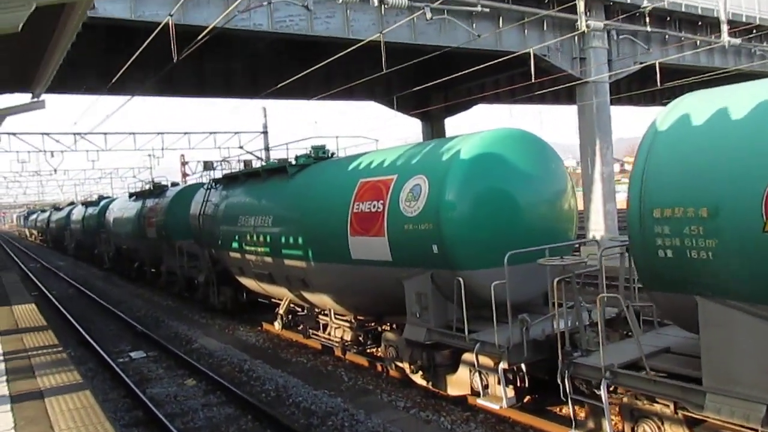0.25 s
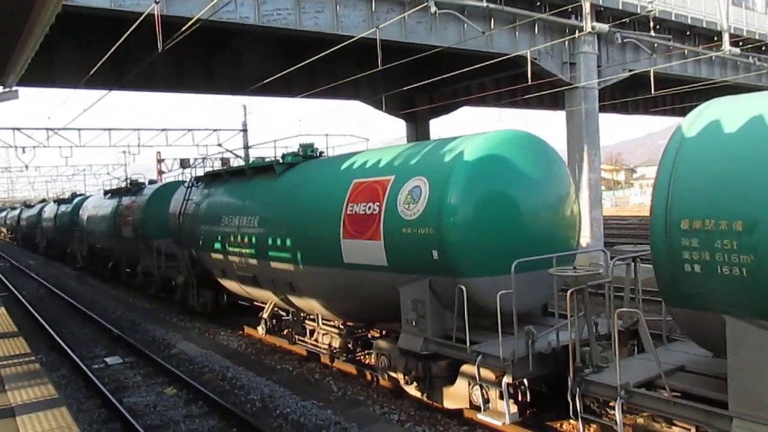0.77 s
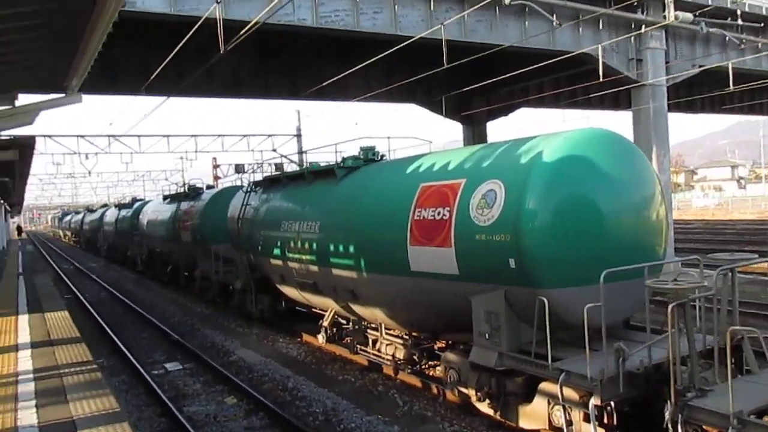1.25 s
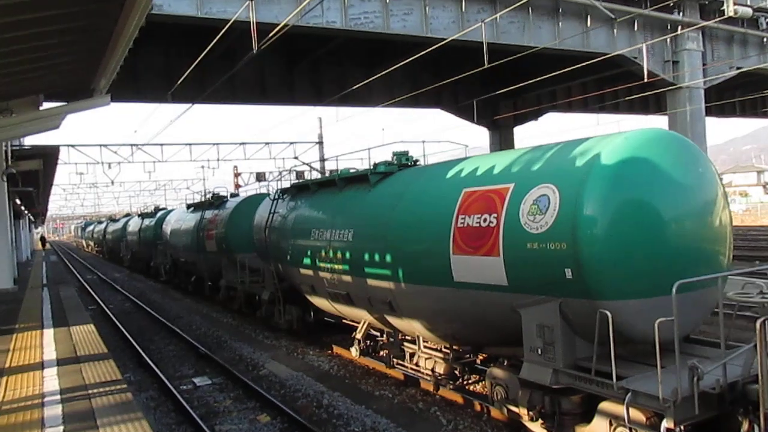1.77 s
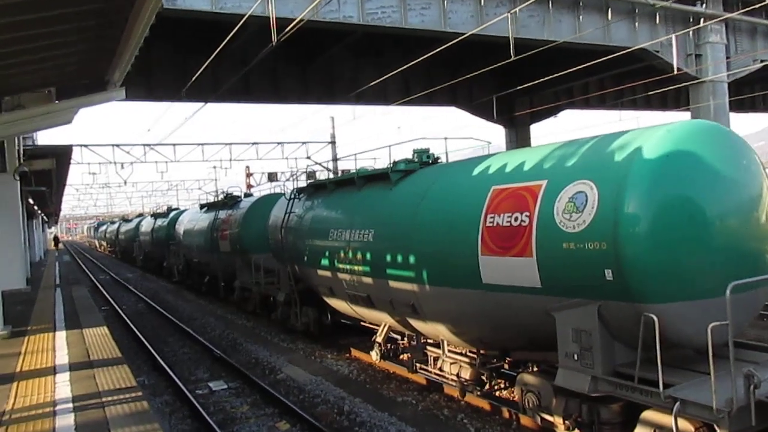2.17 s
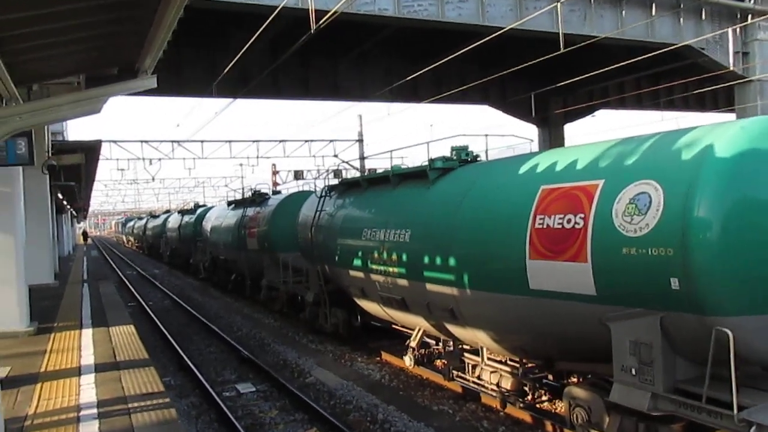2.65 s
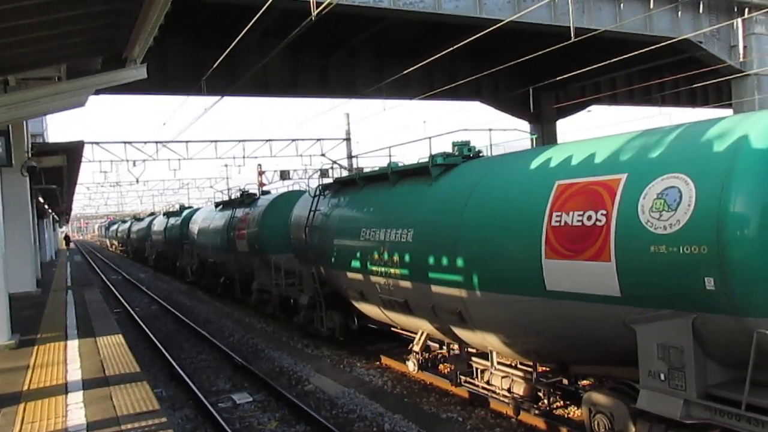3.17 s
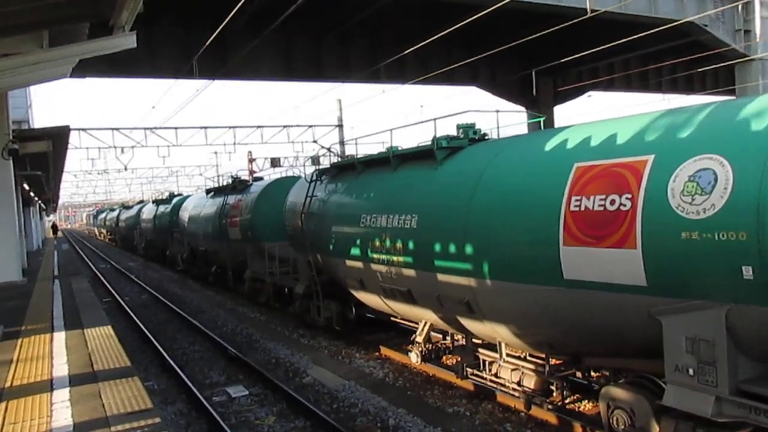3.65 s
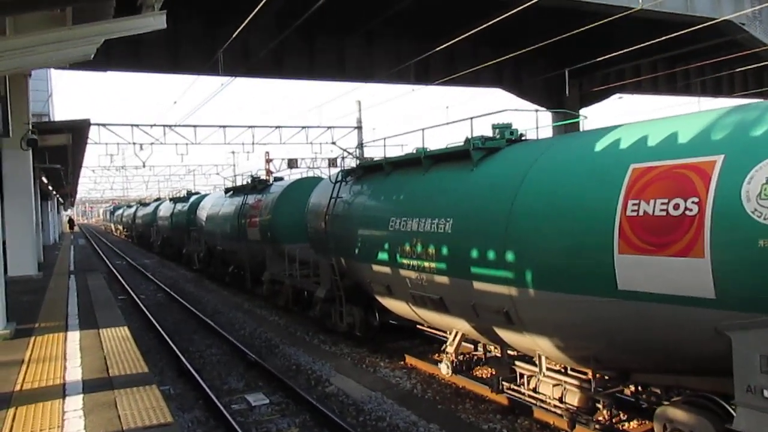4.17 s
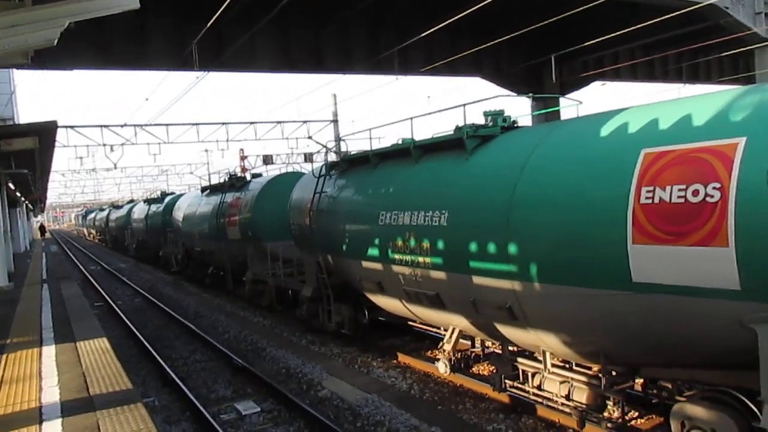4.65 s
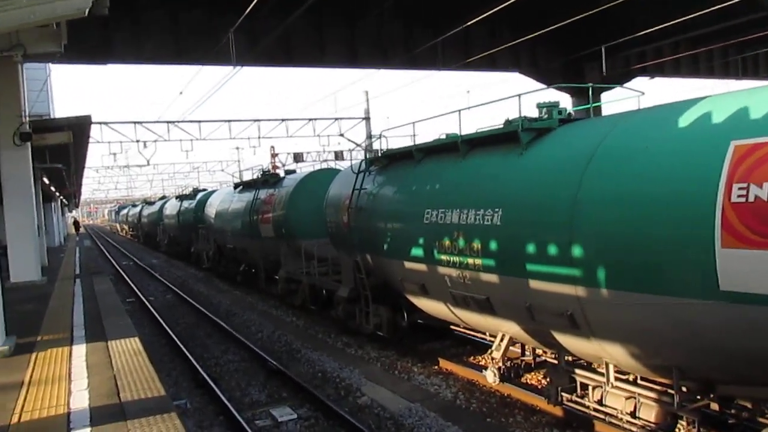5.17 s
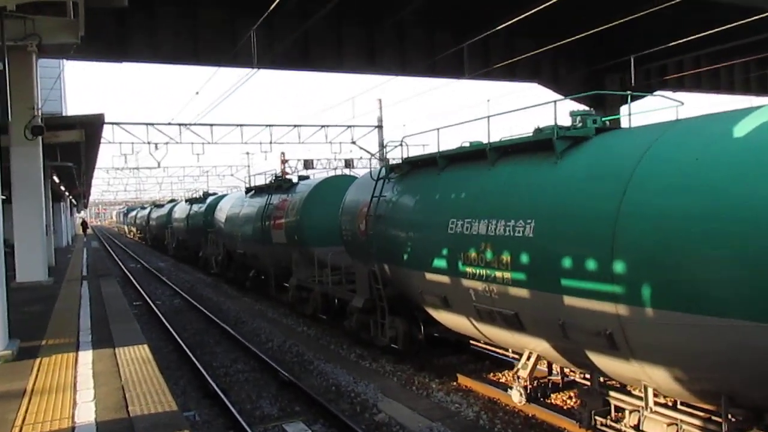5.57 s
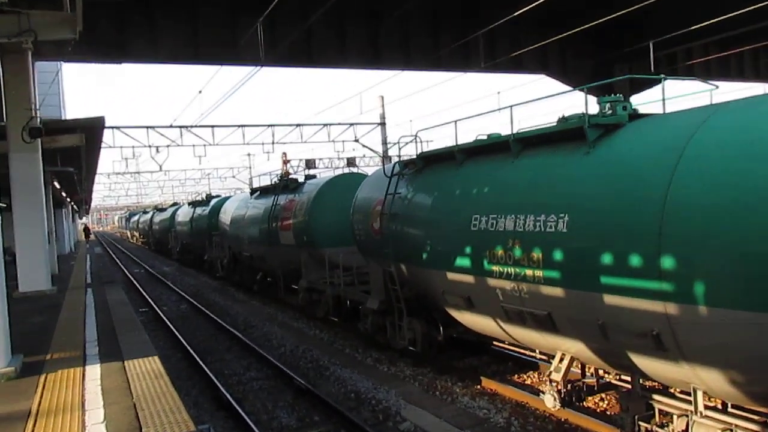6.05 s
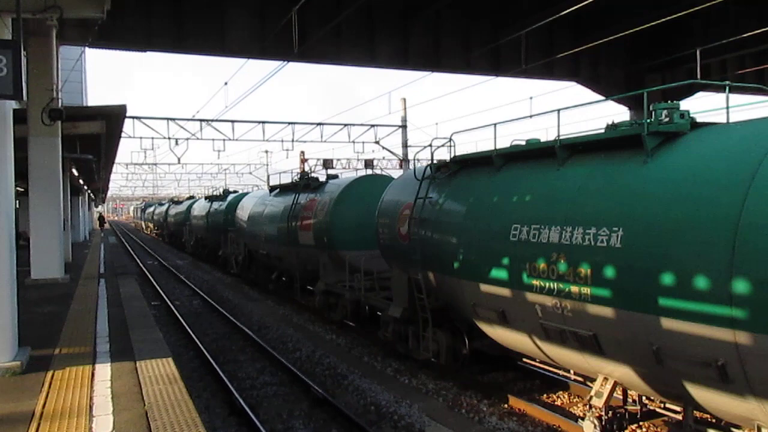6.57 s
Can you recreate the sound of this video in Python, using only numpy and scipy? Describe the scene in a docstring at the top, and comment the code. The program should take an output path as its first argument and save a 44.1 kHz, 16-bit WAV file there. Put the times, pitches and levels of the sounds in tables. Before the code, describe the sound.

A standing line of tank wagons releases its brake air beside a station platform. A bright, sizzling hiss and a hollow roar run from the start; the treble slowly fades while the roar holds. From about two and a half seconds a breathy mid-pitched whistle joins. Soft echoes glide through the jet, distant rumble lies beneath, and wind flutters on the microphone, mostly at right.

```python
"""A hollow roar and a bright hiss of escaping air, the hiss fading first, with a breathy whistle over them.
A standing train of tank wagons releases its air brakes, heard from the platform under a road bridge.
Jet and whistles are shaped noise; the listener moves along the wagons, so short gliding echoes colour the jet.
Behind lie a low rumble, a faint hum and soft rushes; light wind flutters mostly on the right microphone."""
import sys
import numpy as np
from scipy import signal
from scipy.fft import rfft, irfft, next_fast_len
from scipy.io import wavfile
from scipy.ndimage import uniform_filter1d

SR = 44100
rng = np.random.default_rng(int(sys.argv[2]) if len(sys.argv) > 2 else 0)


def file_out(sig):
    """Save sig as 16-bit WAV at sys.argv[1]."""
    # one column per channel
    cols = np.atleast_2d(sig).T
    # limit, then scale
    lim = np.clip(cols, -1, 1)
    pcm = np.round(lim * 32767).astype(np.int16)
    wavfile.write(sys.argv[1], SR, pcm)


N = 300758
TIME = np.arange(N) / SR

# Station rumble colour. Each row: frequency [Hz], relative spectral density [dB].
YARD_COLOUR = [(15, -7), (35, 1), (80, -0.5), (150, -2), (250, -1), (380, -3), (500, 2), (650, 0.5),
               (1000, -12.5), (2000, -34)]
# Colour of the low rushes. Each row: frequency [Hz], relative spectral density [dB].
RUSH_COLOUR = [(150, -17), (280, 1.5), (400, -2), (520, 4.5), (750, -4.5), (1200, -18)]
# Soft low rushes nearby. Each row: centre [s], level before the common lift [dB], half-length [s].
RUSHES = [(2.03, -43, 0.07), (2.25, -46, 0.13), (5.57, -45.5, .066), (5.82, -47, 0.18)]
YARD_DB, HUM_HZ, HUM_PEAK_DB = -46, 84, -60

# Colour of large eddies. Each row: frequency [Hz], relative spectral density [dB].
LARGE_EDDY_COLOUR = [(12, 7), (30, -2), (70, 4), (120, -1), (180, -9.5), (280, -23), (600, -46)]
# Colour of small eddies. Each row: frequency [Hz], relative spectral density [dB].
SMALL_EDDY_COLOUR = [(80, -5), (150, -2), (250, -5), (400, -27), (700, -38)]
# Strongest wind puffs. Each row: centre [s], large-eddy level [dB], half-length [s].
PUFFS = [(.878, -23, 0.009), (1.005, -31.5, 0.031), (1.46, -37, .04), (2.52, -37.5, 0.18),
         (2.79, -31, 0.02), (3.56, -34.5, 0.055), (3.95, -32.5, 0.044), (4.125, -30.5, 0.018),
         (4.31, -34.5, 0.021), (5.2, -29, 0.044), (5.31, -36, .03), (5.995, -25, 0.012), (6.21, -29, 0.032),
         (6.42, -32.5, .025), (6.565, -28, .02)]
# Breeze between puffs: mean level rises over the first 2.5 s, then holds; gusts spread about it.
BREEZE_START_DB, BREEZE_HELD_DB, BREEZE_RISE_S = -58, -47.5, 2.5
GUST_SPREAD_DB, GUST_RATE_HZ = 5, 5

# Level difference between the ears. Each row: frequency [Hz], left minus right [dB].
EAR_DIFFERENCE = [(500, 0), (1200, -.5), (2500, -2), (4500, -1), (8000, 3), (12000, 3.4), (15000, -2)]
# Scattering on the way to the ears. Each row: frequency [Hz], diffuse-to-direct ratio [dB],
# to which the overall diffuse level is added.
SCATTER = [(500, -15.5), (1200, -4), (2000, -5.5), (3200, 6), (5000, -4.5), (7500, -3.5), (11000, 5),
           (15000, 24)]
# Right ear's lead. The one row: value at first [ms], change [ms per s].
RIGHT_LEAD = (-.036, .013)
# Left-right balance. The one row: value at first [dB], change [dB per s].
BALANCE = (0.56, -0.34)
# The valve is in plain view until the wagon's side hides it; then the diffuse level grows.
DIFFUSE_DB, HIDDEN_S, HIDING_DB_PER_S = -0.14, 3.85, 2

# Hollow colour of the exhaust port. Each row: frequency [Hz], relative spectral density [dB].
ROAR_COLOUR = [(400, -42), (700, -16), (870, -10), (1020, -2.5), (1180, 1), (1300, 0.5), (1460, -3.5),
               (1750, -15), (2200, -67)]
# Its upper band. Each row: frequency [Hz], relative spectral density [dB].
UPPER_ROAR_COLOUR = [(1500, -22), (1850, -4.5), (2250, -3), (2550, 3), (2800, 0.5), (3050, -6),
                     (3300, -10.5), (4000, -26)]
# Colour of the free jet. Each row: frequency [Hz], relative spectral density [dB].
HISS_COLOUR = [(2900, -26), (3500, -5.5), (4000, -1.5), (4500, 2.5), (4900, 5), (5200, 12.5), (5900, 3),
               (6900, 1), (7600, 3), (8250, 3.5), (9400, 5), (10000, -4.5), (12500, -24)]
# Its top band. Each row: frequency [Hz], relative spectral density [dB].
SIZZLE_COLOUR = [(9000, -18), (10500, -3), (10900, 4), (11400, -1.5), (12200, -0.5), (13100, 1), (14900, 0),
                 (16000, -1.5), (17000, -30)]
# Roar, upper roar, hiss, sizzle in turn as the pressure falls. Each row: level at first [dB],
# loss [dB per s, negative gains], share of the sway [ratio].
JET_PARTS = [(-27, -0.1, 1.1), (-32, 0.58, 0.88), (-28.5, 1.0653, 0.9), (-29, 2.1, 0.54)]
# Jet's sway about its steady fall as the listener walks on. Each row: time [s], level change [dB].
JET_SWAY = [(0, .5), (2.1, -0.27), (2.6, -0.76), (4.1, -1.5), (5.25, 1), (6.8, -0.06)]

# Higher outlet resonances, each swelling once as the listener passes. Each row: pitch at the loudest
# moment [Hz], width [Hz], peak level [dB], loudest moment [s], half-length [s].
RESONANCES = [(1948, 750, -40, .9, 1.57), (2098, 79, -42, 2.1, 0.31), (4250, 290, -42.5, 2.1, 0.54),
              (5024, 1200, -36.5, .5, 0.63), (5253, 450, -34.5, 3.45, 0.63), (6110, 730, -37, 1.0, 0.73),
              (7580, 440, -42, 4.3, 0.55), (9300, 83, -46, 2.3, 1.7), (10920, 220, -37.5, 1.9, 0.47),
              (12920, 400, -49, 4.3, 0.62), (13300, 450, -37, .4, 0.81), (14530, 160, -43, .6, .3)]
# Main whistle: pitch at its start and level before balance; all whistles share the sag.
WHISTLE_HZ, WHISTLE_WIDTH_HZ, WHISTLE_DB, SAG_SHARE_PER_S = 1172.6, 70, -28, .014
WHISTLE_START_S, WHISTLE_ATTACK_S, WHISTLE_HOLD_S, WHISTLE_RELEASE_S = 2.45, 0.36, 1.26, 2.3

LOWPASS_HZ = 15800


def from_db(db):
    """Decibels to amplitude gain."""
    return 10 ** (np.asarray(db) / 20)


def rms_one(x):
    """Scale to unit rms."""
    return x / np.sqrt(np.mean(x ** 2) + 1e-20)


def coloured(x, spectrum):
    """Filter by rows of (Hz, dB), joined on a log-frequency axis."""
    size = next_fast_len(N)
    table_hz, table_db = np.transpose(spectrum)
    bin_hz = np.maximum(np.fft.rfftfreq(size, 1 / SR), 1)
    gain = from_db(np.interp(np.log(bin_hz), np.log(table_hz), table_db))
    return irfft(rfft(x, size) * gain, size)[..., :N]


def noise(spectrum, channels=3):
    """Independent noises of one colour, 40 dB down an octave beyond the table; rms 1 overall."""
    (low_hz, low_db), (high_hz, high_db) = spectrum[0], spectrum[-1]
    closed = [(low_hz / 2, low_db - 40), *spectrum, (high_hz * 2, high_db - 40)]
    return rms_one(coloured(rng.standard_normal((channels, N)), closed))


def drift(rate_hz):
    """Slow random control with rms 1: two-pole low-passed noise."""
    step = 40  # samples per control point
    pole = np.exp(-2 * np.pi * rate_hz * step / SR)
    raw = rng.standard_normal(N // step + 2002)
    slow = signal.lfilter([1], [1, -2 * pole, pole * pole], raw)[2000:]  # drop the filter's start
    return np.interp(np.arange(N) / step, np.arange(len(slow)), rms_one(slow))


def delayed(x, delays_ms):
    """Copies of x along paths of changing length, read from a finer grid to keep the treble."""
    finer = 4
    fine = signal.resample_poly(x, finer, 1)
    copies = []
    for ms in delays_ms:
        index = ((TIME - ms / 1000) * finer * SR + .5).astype(int)
        copies.append(fine.take(index, mode="wrap"))
    return np.array(copies)


def swell(t_s, half_length_s):
    """Power bell around t = 0; the half-length is its standard deviation."""
    return np.exp(-.5 * (t_s / half_length_s) ** 2)


def swells(rows):
    """Summed power of rows of (s, dB, half-length s)."""
    return sum(from_db(db) ** 2 * swell(TIME - s, half_length_s) for s, db, half_length_s in rows)


def station(side_db=-11, rush_lift_db=2.0, balance_db=-1.5):
    """Distant rumble, nearly alike in both ears, a few soft rushes and a faint wavering hum."""
    rushes = noise(RUSH_COLOUR, channels=2) * np.sqrt(swells(RUSHES)) * from_db(rush_lift_db)
    mid, side = noise(YARD_COLOUR, channels=2) * from_db(YARD_DB) + rushes
    hum_hz = HUM_HZ + 0.936 * drift(1.8)
    hum_db = HUM_PEAK_DB + 3.8 * drift(1.4)
    hum = np.sin(2 * np.pi * np.cumsum(hum_hz) / SR) * from_db(hum_db)
    ears = np.array([[1], [-1]])
    return (mid + hum + from_db(side_db) * side * ears) * from_db(ears * balance_db / 2)


def wind(left_db=-10, opposed_share=0.87):
    """Eddies buffet the right port; the left one feels them more weakly and largely in opposite phase."""
    breeze_db = np.interp(TIME, [0, BREEZE_RISE_S], [BREEZE_START_DB, BREEZE_HELD_DB])
    breeze_db = breeze_db + GUST_SPREAD_DB * drift(GUST_RATE_HZ)
    strength = np.sqrt(from_db(breeze_db) ** 2 + swells(PUFFS))
    large = noise(LARGE_EDDY_COLOUR, channels=2) * from_db(4 * drift(45))  # eddies come in lumps
    large /= np.sqrt(uniform_filter1d(large ** 2, size=1800))  # each puff keeps its own strength
    # hard puffs break up and reach higher: small eddies match the large ones at -18 dB
    small = noise(SMALL_EDDY_COLOUR, channels=2) * strength / from_db(-18)
    right, left_own = (large + small) * strength
    own_share = np.sqrt(1 - opposed_share ** 2)
    left = from_db(left_db) * (own_share * left_own - opposed_share * right)
    return np.array([left, right])


def at_ears(air):
    """The direct sound swings to the right while the wash from under the bridge gains on it."""
    lead_ms = RIGHT_LEAD[0] + RIGHT_LEAD[1] * TIME
    balance_db = BALANCE[0] + BALANCE[1] * TIME
    diffuse_db = DIFFUSE_DB + HIDING_DB_PER_S * np.maximum(TIME - HIDDEN_S, 0)
    # direct and wash split the power in each band
    direct_share = [(hz, -10 * np.log10(1 + from_db(db) ** 2)) for hz, db in SCATTER]
    wash_share = [(hz, -10 * np.log10(1 + from_db(-db) ** 2)) for hz, db in SCATTER]
    direct = delayed(coloured(air[0], direct_share), [lead_ms / 2, -lead_ms / 2])
    wash = coloured(air[1:], wash_share) * from_db(diffuse_db)
    left, right = (direct + wash) * np.sqrt(2 / (1 + from_db(diffuse_db) ** 2))
    left_colour = [(hz, db / 2) for hz, db in EAR_DIFFERENCE]
    right_colour = [(hz, -db / 2) for hz, db in EAR_DIFFERENCE]
    left = coloured(left, left_colour) * from_db(balance_db / 2)
    right = coloured(right, right_colour) * from_db(-balance_db / 2)
    return np.array([left, right])


def wagon_echoes(air, count=8, echo_db=-12, stretch_per_s=.045):
    """Wheels, tank and ballast return short echoes; paths lengthen, so ripples slide down the hiss."""
    gain = from_db(echo_db)
    mid_ms = np.geomspace(2.2, 12, count) * rng.uniform(.9, 1.1, count)  # delays at half time
    delays_ms = np.outer(mid_ms, 1 + stretch_per_s * (TIME - TIME.mean()))
    strengths = np.array([drift(0.37) for _ in range(count)])
    strengths /= np.sqrt(np.mean(strengths ** 2, axis=0))  # the paths trade a steady total
    reflected = signal.lfilter([.8, -.58], [1, -.6], air)  # small parts reflect short waves best
    echoes = np.array([np.sum(strengths * delayed(x, delays_ms), axis=0) for x in reflected])
    return (air + gain * echoes) / np.sqrt(1 + count * gain ** 2)


def breathy_tone(hz, width_hz, at_s):
    """A band of turbulence that sags through hz at time at_s; rms 1."""
    lowpass = signal.butter(3, width_hz / 2, fs=SR, output="sos")
    in_phase, quadrature = signal.sosfilt(lowpass, rng.standard_normal((2, 3, N)))
    t = TIME - at_s
    phase = 2 * np.pi * hz * (t - SAG_SHARE_PER_S * t ** 2 / 2)
    return rms_one(in_phase * np.cos(phase) + quadrature * np.sin(phase))


def resonance_whistles():
    """Narrow and broad bands of turbulence each swell once and sag in pitch."""
    total = 0
    for hz, width_hz, db, peak_s, half_length_s in RESONANCES:
        envelope = from_db(db) * np.sqrt(swell(TIME - peak_s, half_length_s))
        total = total + breathy_tone(hz, width_hz, peak_s) * envelope
    return total


def main_whistle(balance_db=-2.0, diffuse_db=-3.5):
    """The outlet sings for a few seconds, without wagon echoes, right of the jet, never a clean tone."""
    corners_s = np.cumsum([WHISTLE_START_S, WHISTLE_ATTACK_S, WHISTLE_HOLD_S, WHISTLE_RELEASE_S])
    envelope = np.interp(TIME, corners_s, [0, 1, 1, 0])
    tone = breathy_tone(WHISTLE_HZ, WHISTLE_WIDTH_HZ, WHISTLE_START_S) * envelope * from_db(WHISTLE_DB)
    air = tone * from_db([[0], [diffuse_db], [diffuse_db]])
    return at_ears(air) * from_db(np.array([[1], [-1]]) * balance_db / 2)


def jet():
    """Turbulent outflow, one direct and two scattered signals; treble fades first as the pressure falls."""
    surge_db = .2 * drift(5)  # common to all parts
    sway_s, sway_points_db = np.transpose(JET_SWAY)
    sway_db = np.interp(TIME, sway_s, sway_points_db)
    colours = (ROAR_COLOUR, UPPER_ROAR_COLOUR, HISS_COLOUR, SIZZLE_COLOUR)
    total = 0
    for colour, (start_db, loss_db_per_s, sway_share) in zip(colours, JET_PARTS):
        flutter_db = .3 * drift(4)
        level_db = start_db - loss_db_per_s * TIME + sway_share * sway_db + surge_db + flutter_db
        total = total + noise(colour) * from_db(level_db)
    return total


def scene():
    """Escaping air over the station background, with wind on the microphone."""
    background = station() + wind()
    escaping_air = at_ears(wagon_echoes(jet()) + resonance_whistles())
    return background + escaping_air + main_whistle()


def record(dry):
    """Steep elliptic low-pass: 0.1 dB ripple, 80 dB stop band."""
    return signal.sosfilt(signal.ellip(12, .1, 80, LOWPASS_HZ, fs=SR, output="sos"), dry)


dry = scene()
out = record(dry)
file_out(out)
```